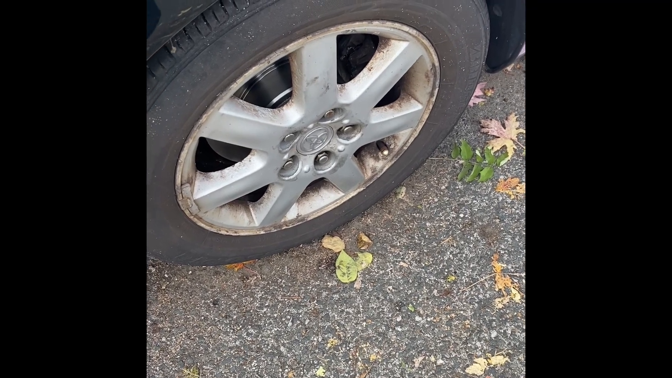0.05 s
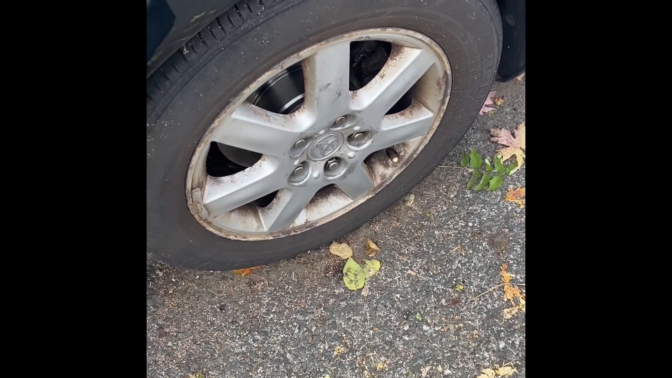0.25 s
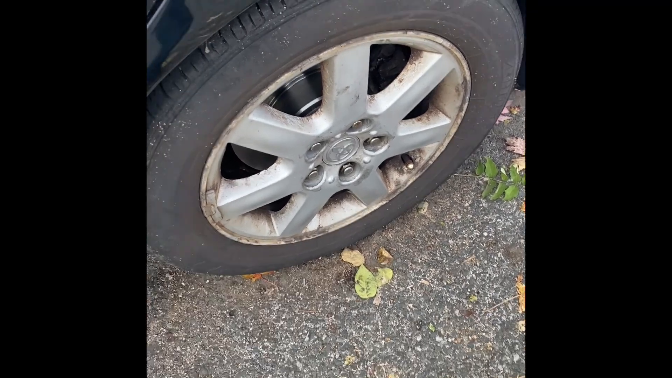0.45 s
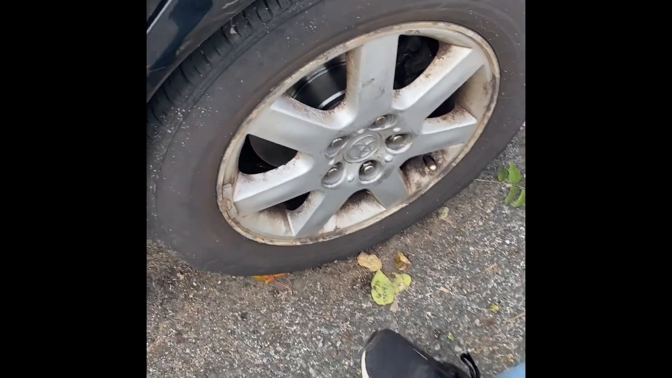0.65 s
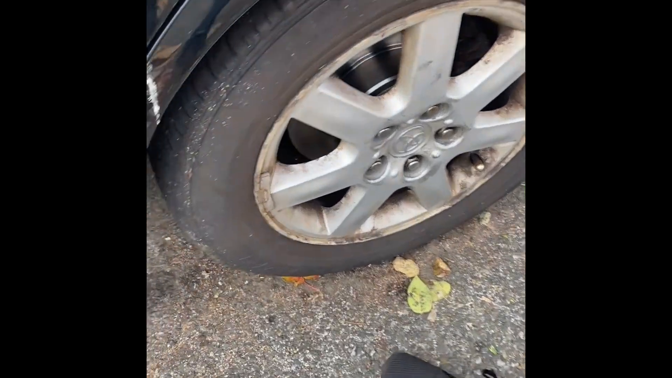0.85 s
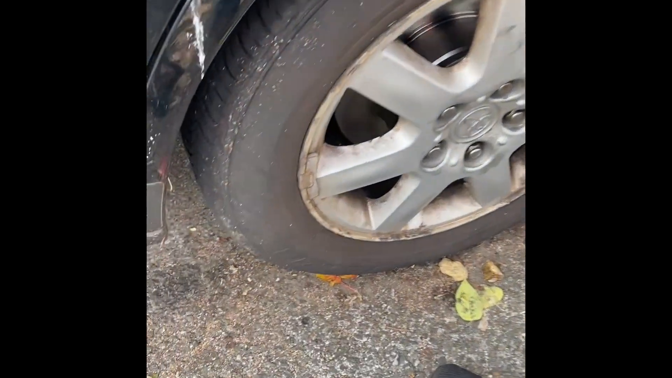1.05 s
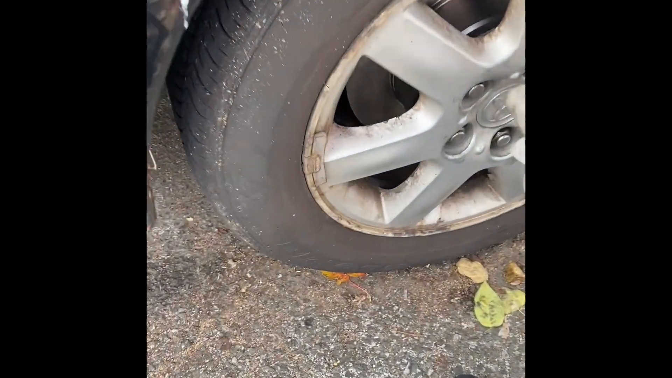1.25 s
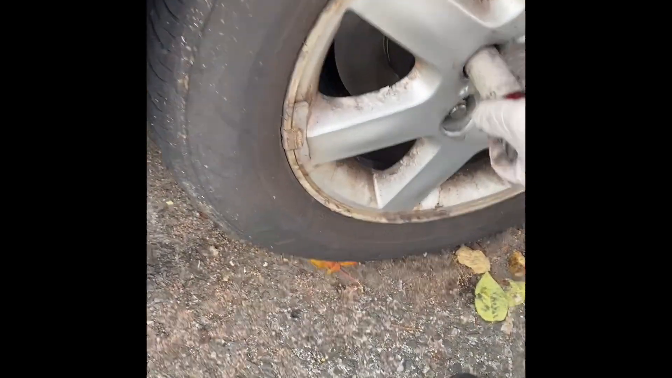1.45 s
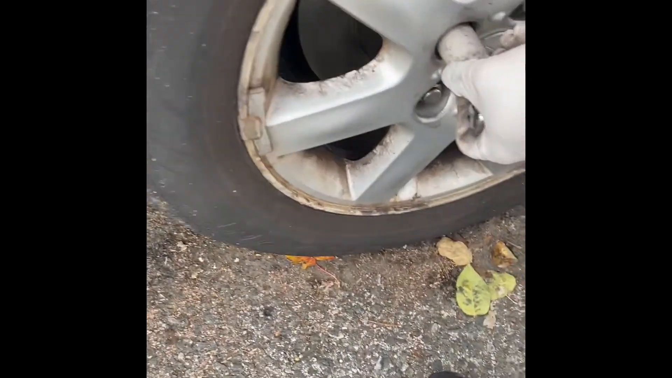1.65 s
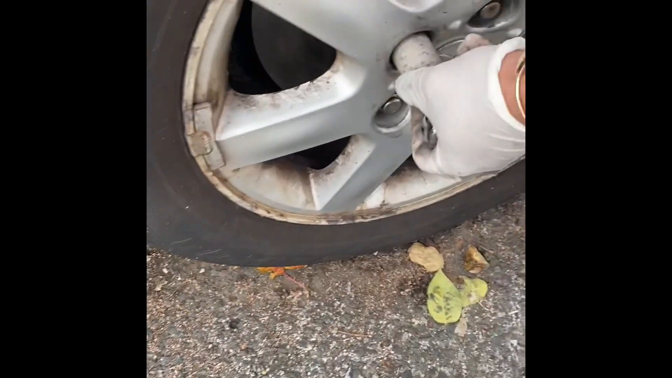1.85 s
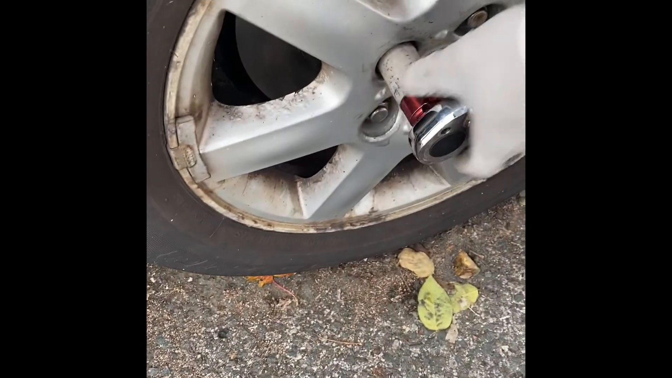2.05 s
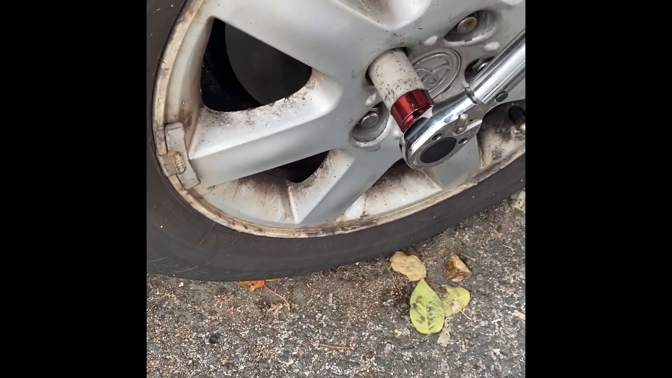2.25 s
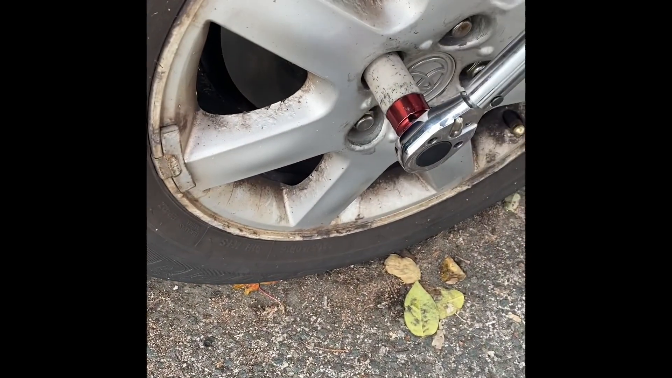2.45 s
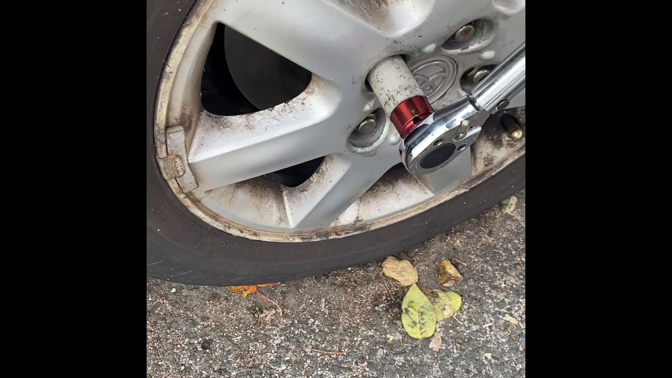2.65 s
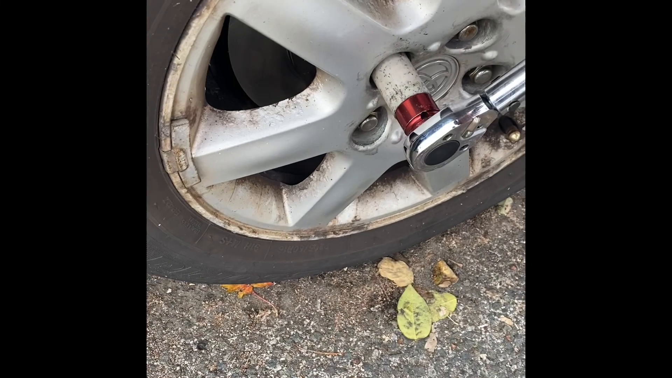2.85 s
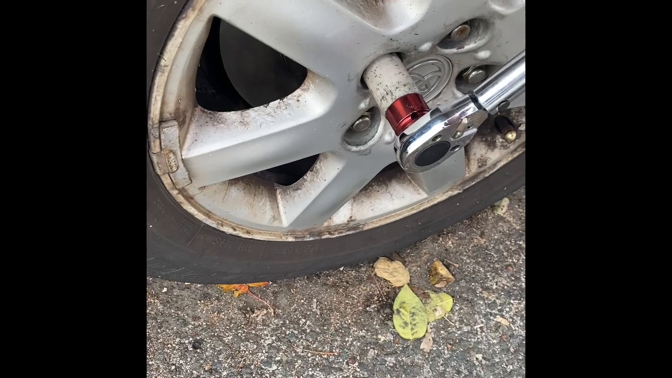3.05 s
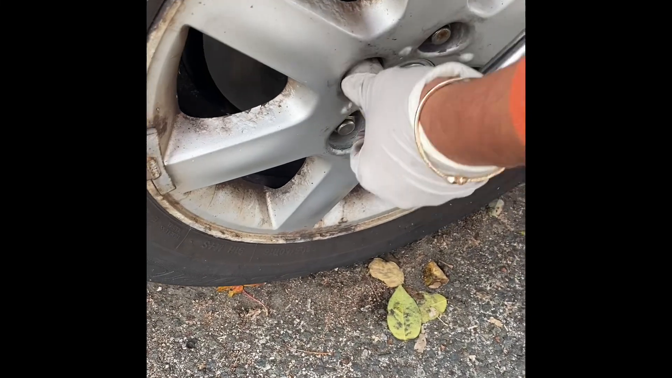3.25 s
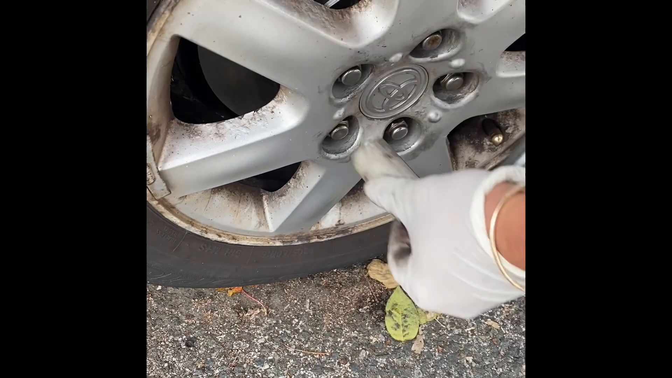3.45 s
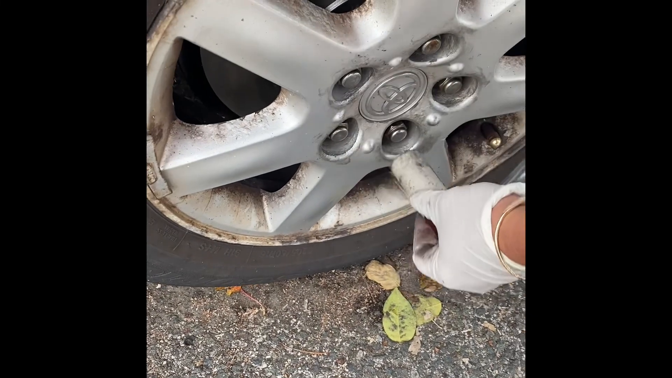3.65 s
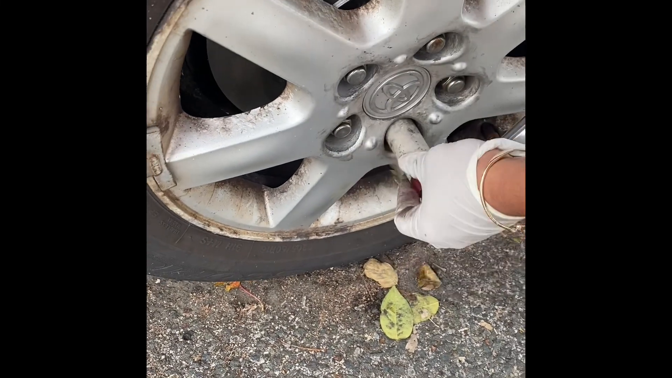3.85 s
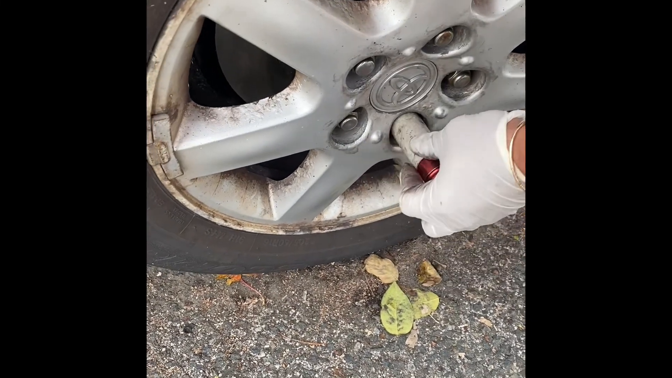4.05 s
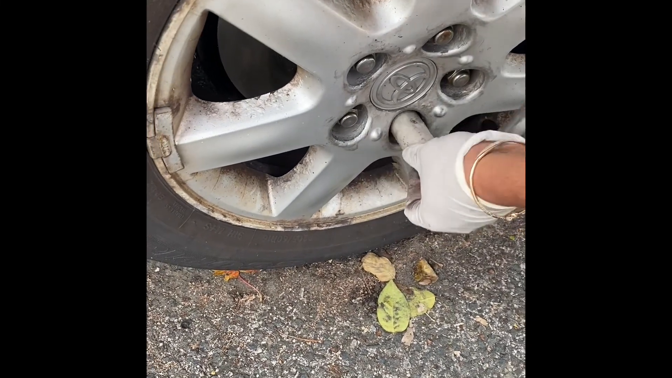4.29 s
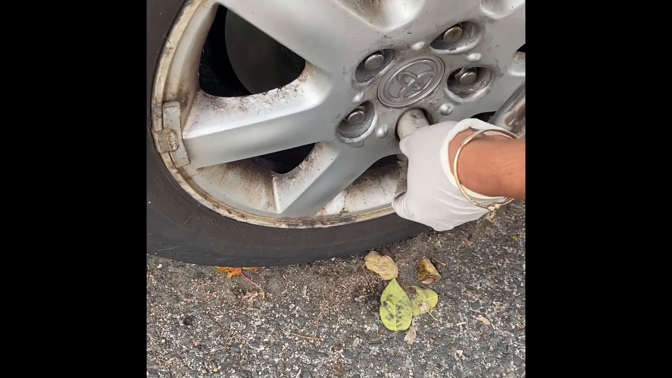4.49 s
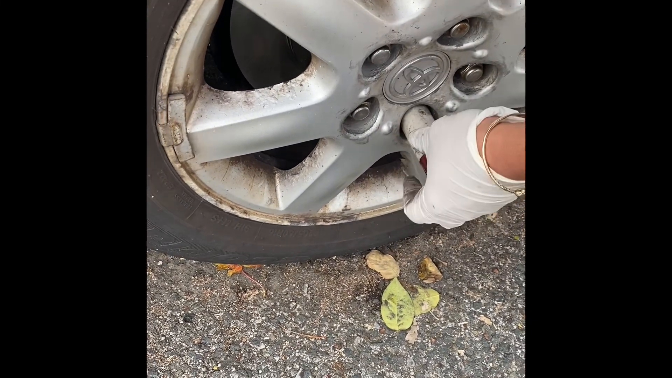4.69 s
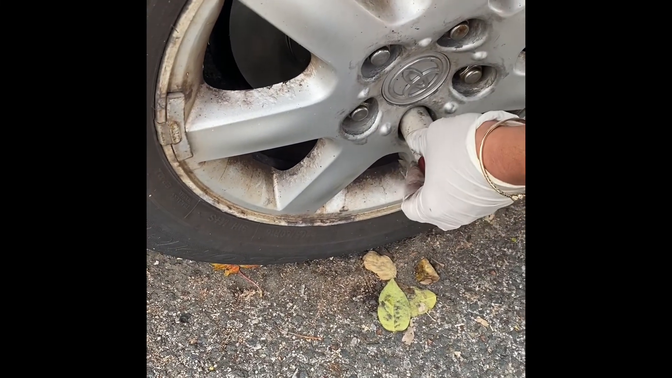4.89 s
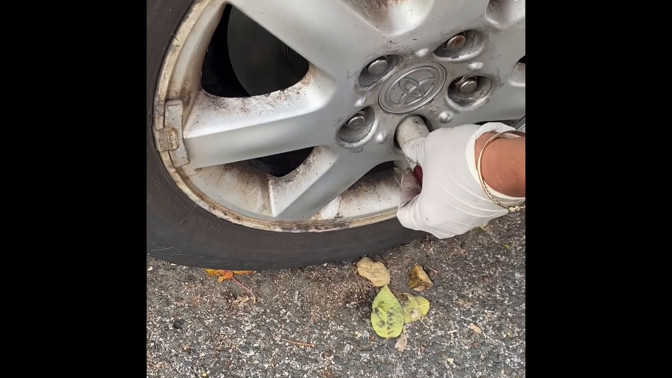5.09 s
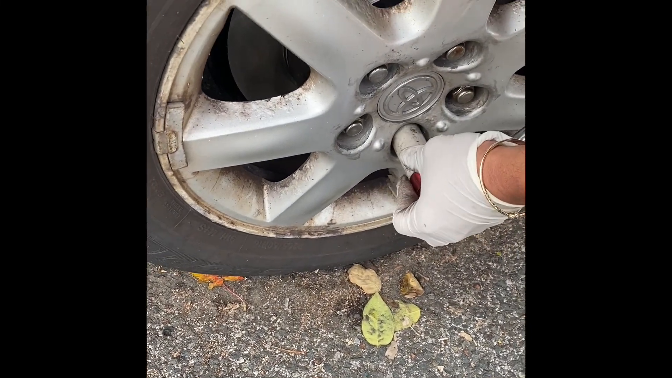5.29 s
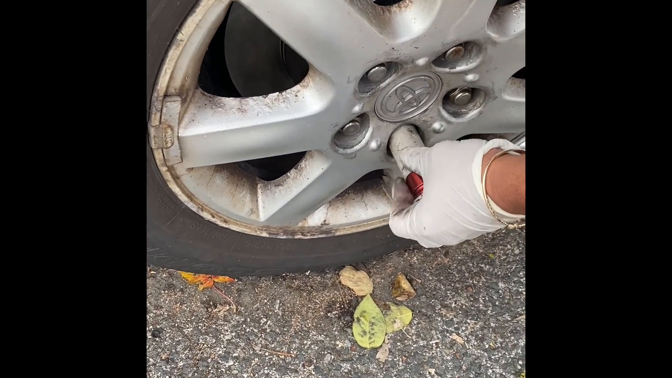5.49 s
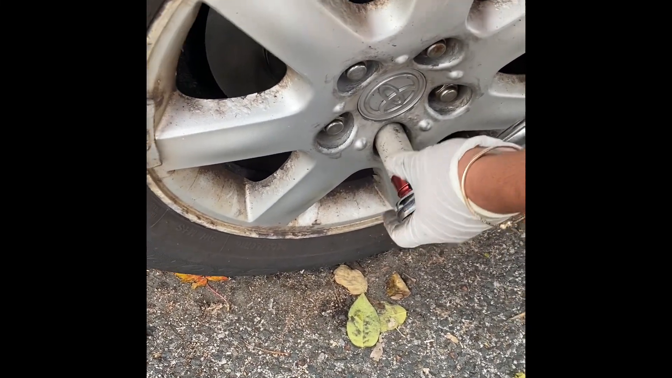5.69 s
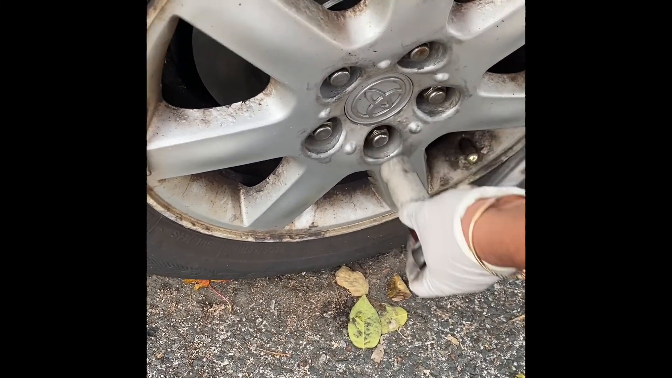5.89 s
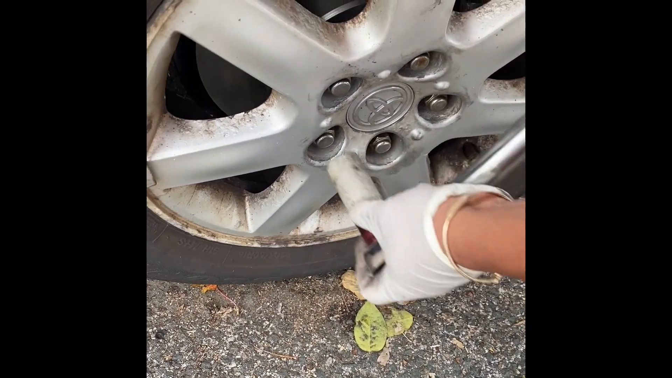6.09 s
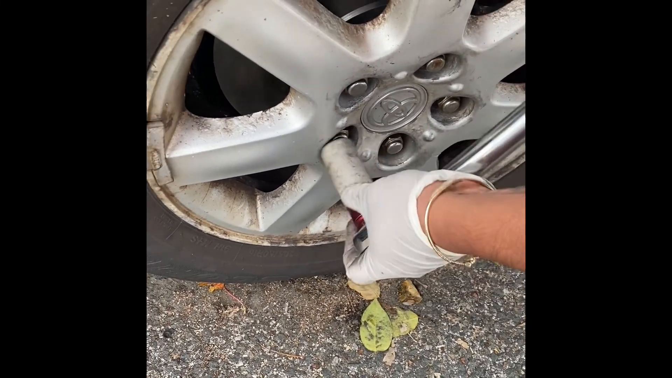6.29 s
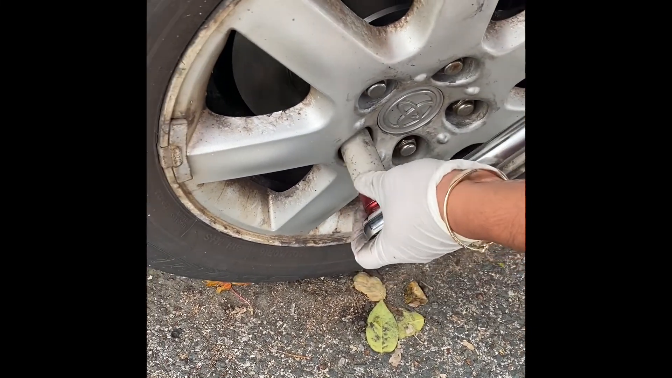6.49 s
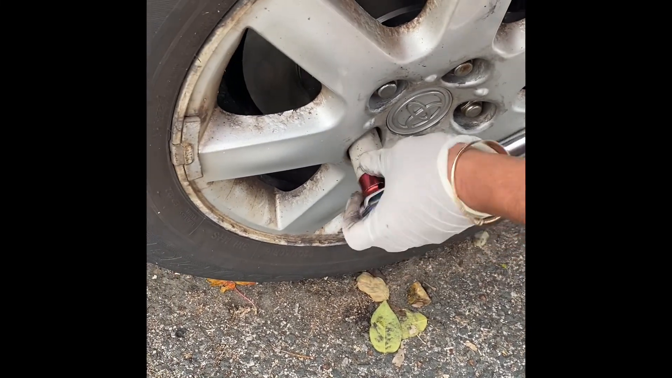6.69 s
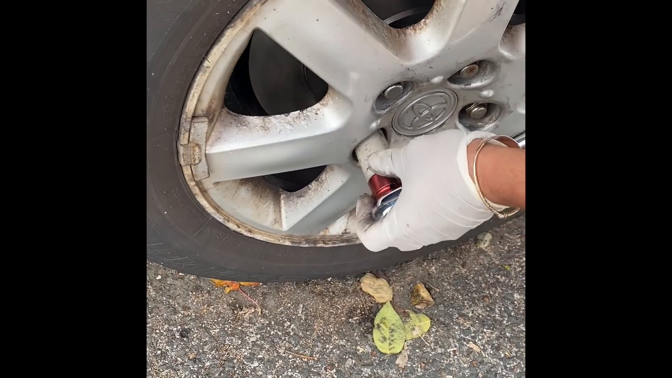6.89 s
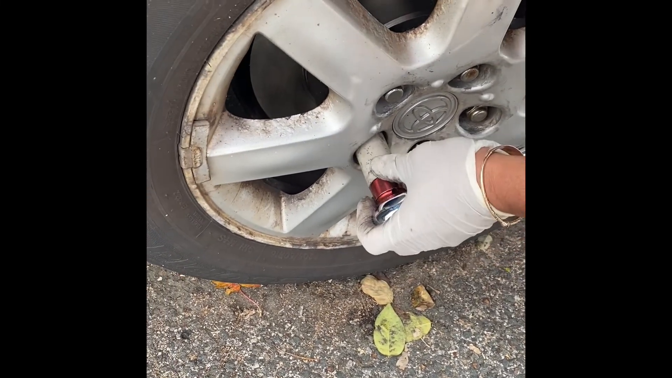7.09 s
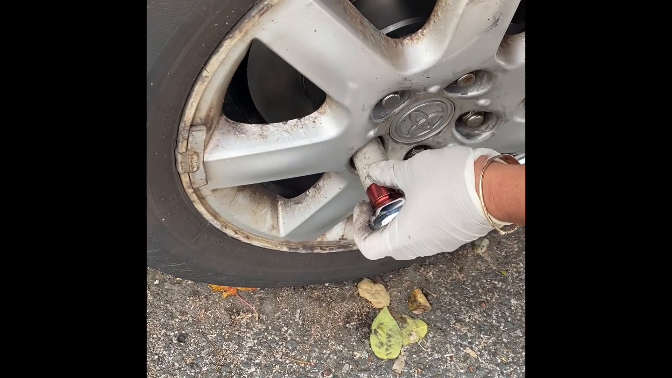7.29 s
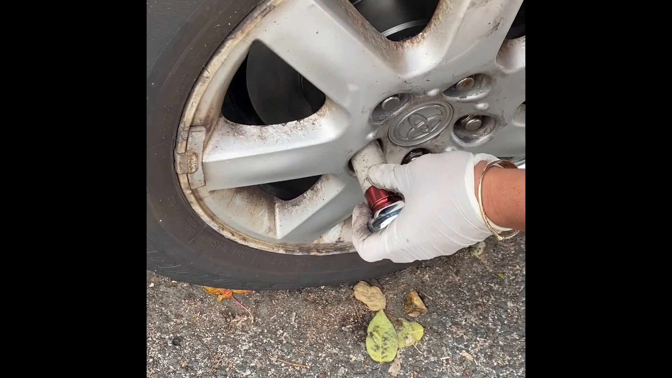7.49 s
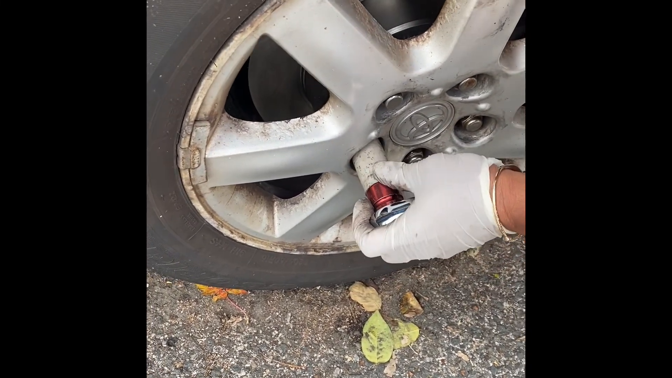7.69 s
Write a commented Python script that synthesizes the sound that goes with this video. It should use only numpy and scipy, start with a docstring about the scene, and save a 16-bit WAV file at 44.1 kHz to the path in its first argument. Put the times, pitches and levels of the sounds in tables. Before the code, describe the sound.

Close-up outdoors on asphalt: quiet rustling and tiny ticks, then a socket knocks and scrapes against an alloy wheel nut. Two hard wrench clicks with dull thumps follow. The socket moves to the next nuts with more clinks, each followed by sharp clicks. Soft glove crackle and faint distant rumble continue underneath. Near, dry stereo sound with almost no echo.

```python
"""Torque wrench on lug nuts

Outdoors on asphalt, a socket clatters onto wheel nuts and the wrench breaks over with a hard click and thump.
Contacts are short bursts of coloured noise; wheel, tyre, socket and spring ring as decaying modes.
Small ticks, scrapes, glove crackles and tyre shudders come from brief clicks and swelling noise.
Steady noise makes the low rumble and rustling hiss; short echoes and two microphone ports give the space."""
import sys
import numpy as np
from scipy import signal
from scipy.fft import rfft, irfft, next_fast_len
from scipy.io import wavfile
from scipy.ndimage import uniform_filter1d

SR = 44100
rng = np.random.default_rng(int(sys.argv[2]) if len(sys.argv) > 2 else 0)


def bounce(signal):
    """Save signal as a 16-bit WAV file at the path given by the first command-line argument."""
    frames = np.transpose(np.atleast_2d(signal))
    limited = np.clip(frames, -1, 1)
    pcm = np.round(limited * 32767).astype(np.int16)
    wavfile.write(sys.argv[1], SR, pcm)


N = 341334
TIME = np.arange(N) / SR
PADDED = next_fast_len(N, real=True)
FREQS = np.maximum(np.fft.rfftfreq(PADDED, 1 / SR), 1)

# Table levels are relative: sources add layer offsets, and noise colours are scaled to rms 1.
# modes of the wheel on its tyre: (frequency [Hz], level [dB], t60 [s])
TYRE_MODES = [(64.7, -7, 0.79), (80, -6.5, 0.27), (98.65, -7, 0.41), (150, 0, 0.32)]
# modes of the alloy spokes and rim: (frequency [Hz], level [dB], t60 [s])
RIM_MODES = [(299, -15, 0.17), (429.5, -15, 0.21), (521, -14, 0.099), (605, -15.5, 0.15),
             (702, -13.5, 0.12), (832, -20, 0.2), (1364, -10, 0.063), (1592, -18.5, 0.088)]
# modes of the socket and wrench body: (frequency [Hz], level [dB], t60 [s])
STEEL_MODES = [(1350, -30, .05), (2000, -18, 0.071), (2480, -25.5, 0.045), (2752, -31, .09),
               (3300, -32, .06), (3650, -17.5, 0.068), (4030, -17, .035), (4585, -29, .05)]
# modes of the handle's jolt through the hub: (frequency [Hz], level [dB], t60 [s])
JOLT_MODES = [(130, -16, 0.05), (255, -1, .02), (455.4, -1.5, 0.032)]
# colour of steel contacts: (frequency [Hz], level per Hz [dB])
CRACK_COLOUR = [(400, -2.5), (900, -4), (1500, 0.5), (2200, 1), (3000, -1.5), (3900, 2.5), (5200, -4),
                (6500, -2), (8500, -21)]
# bright top of contacts and hiss: (frequency [Hz], level per Hz [dB])
TREBLE_COLOUR = [(5000, -37), (7000, -3), (9000, -2.5), (11000, -4), (13000, -7), (15500, -13.5),
                 (17000, -27)]
# many damped low modes of wheel and hub: (frequency [Hz], level per Hz [dB])
HUB_COLOUR = [(70, -21.5), (130, 4.5), (280, 1.5), (430, -1), (560, -6.5), (800, -13), (1300, -32.5)]
# the socket's single high mode: (frequency [Hz], level [dB], t60 [s])
SOCKET_MODE = [(9100, 0, 0.062)]


def from_db(db):
    """Decibels to gain."""
    return 10 ** (np.asarray(db) / 20)


def at_freqs(points):
    """A table over log frequency, read at every bin."""
    hz, value = np.transpose(points)
    return np.interp(np.log(FREQS), np.log(hz), value)


def noise(spectrum):
    """Coloured noise of rms 1."""
    white = rng.standard_normal(PADDED)
    coloured = irfft(rfft(white) * from_db(at_freqs(spectrum)), PADDED)[:N]
    return coloured / coloured.std()


def swell(s, length):
    """One smooth stroke of height 1."""
    return np.sin(np.pi * np.clip((TIME - s) / length, 0, 1))


def bandpass(x, low_hz, high_hz, run=signal.sosfilt):
    """Keep one band of a sound."""
    return run(signal.butter(2, [low_hz, high_hz], "band", fs=SR, output="sos"), x)


def soften(x, cut_hz):
    """Heavy parts take a moment to get moving, so a low-pass rounds the blow."""
    return signal.sosfilt(signal.butter(2, cut_hz, fs=SR, output="sos"), x)


def clatter(times, level_db, decay_ms, spectrum, rise_ms, tail_db, tail_ms):
    """Steel faces chatter for a few ms after each touch; a weaker wash returns from the wheel well."""
    power = np.zeros(N)
    age_ms = 1000 * TIME[:SR // 4]
    attack = 1 - np.exp(-(age_ms / max(rise_ms, .1)) ** 2)
    wash = from_db(tail_db) * attack * np.exp(-age_ms / tail_ms)
    for s, db, fall_ms in zip(times, level_db, decay_ms):
        chatter = attack * np.exp(-age_ms / max(fall_ms, .3))
        shape = chatter / chatter.max() + wash
        start = int(s * SR)
        power[start:start + len(shape)] += (from_db(db) * shape[:N - start]) ** 2
    grain = noise(spectrum)
    # level the noise's own short swings so that the envelope sets the strength
    grain_level = np.sqrt(uniform_filter1d(grain ** 2, size=130) + 1e-6)
    return np.sqrt(power) * grain / grain_level


def strike(times, level_db, modes, scatter_db):
    """Each blow sets every mode ringing as a decaying sine with a strength of its own."""
    out = np.zeros(N)
    at = (times * SR).astype(int)
    chance = rng.standard_normal((len(at), len(modes)))
    for k, (hz, db, t60) in enumerate(modes):
        blows = np.full(N, 1e-18)
        polarity = (-1) ** k
        blows[at] = from_db(level_db + db + scatter_db * chance[:, k]) * polarity
        radius = from_db(-60 / (t60 * SR))
        angle = 2 * np.pi * hz / SR
        resonator = [1, -2 * radius * np.cos(angle), radius * radius]
        out += signal.lfilter([0, np.sin(angle)], resonator, blows)
    return out


def clang(times, level_db, pitch_hz, decay_s, spread):
    """The place of contact favours one dense cluster of heavily damped steel modes, made of band noise."""
    out = np.zeros(N)
    age = TIME[:SR // 12]
    shape = np.exp(-age / decay_s) * (1 - np.exp(-age / 0.00066))
    for s, db, hz in zip(times, level_db, pitch_hz):
        white = rng.standard_normal(len(age))
        cluster = bandpass(white, hz / (1 + spread), hz * (1 + spread), run=signal.sosfiltfilt)
        cluster = cluster / np.sqrt(uniform_filter1d(cluster ** 2, size=150) + 1e-9)
        start = int(s * SR)
        out[start:start + len(age)] += (from_db(db) * shape * cluster)[:N - start]
    return out


def wrench_breaks(crack_db=0, treble_db=0, clack_db=-10, steel_db=-8, clang_db=-2, jolt_db=9,
                  hub_db=-13, rim_db=-7, tyre_db=-23, ring_db=-1, spring_db=-41, jolt_lag_s=0.0019):
    """The pawl tips over with a crack; the handle hits its stop just after and jolts the wheel."""
    # the wrench breaks over or snaps back: (time [s], crack [dB], treble [dB], thump [dB],
    # socket ring [dB], clang [dB], base clatter decay [ms])
    breaks = [(2.6505, -15, -11.5, -16, -18.5, -20, 1.74), (2.9391, -11, -17, -16, -20, -21, 3.04),
              (5.156, -14.5, -13.5, -18, -29, -19.5, 3.75), (5.5402, -9.5, -15.5, -15, -27, -19.5, 3.93),
              (7.422, -10.5, -10, -16.5, -42, -27.5, 2.3)]
    # colour of the pawl's crack: (frequency [Hz], level per Hz [dB])
    snap_colour = [(1200, -29), (2200, -10.5), (2800, -0.5), (3900, 3), (4700, -3.5), (5600, -8.5),
                   (6600, 0.5), (8500, -28)]
    # lower body of the crack: (frequency [Hz], level per Hz [dB])
    clack_colour = [(350, -20), (600, -6.5), (800, -0.5), (1050, -3), (1600, 2), (2100, -2), (3200, -16)]
    s, crack, treble, thump, ring, body, decay = np.transpose(breaks)
    out = clatter(s, crack + crack_db, decay, snap_colour, rise_ms=0.34, tail_db=-30, tail_ms=30)
    out += clatter(s, treble + treble_db, decay * 1.1, TREBLE_COLOUR,
                   rise_ms=0.33, tail_db=-29.5, tail_ms=11)
    out += clatter(s, crack + clack_db, decay * 1.8, clack_colour, rise_ms=0.37, tail_db=-35, tail_ms=120)
    out += strike(s, crack + steel_db, STEEL_MODES, scatter_db=0.5)
    out += clang(s, body + clang_db, np.full(len(s), 3750), decay_s=0.0073, spread=0.26)
    out += strike(s, ring + ring_db, SOCKET_MODE, scatter_db=5)
    out += spring_ring(s, crack + spring_db)
    stop = s + jolt_lag_s
    out += clatter(stop, thump + hub_db, decay * 4, HUB_COLOUR, rise_ms=6.1, tail_db=-21, tail_ms=27)
    out += soften(strike(stop, thump + jolt_db, JOLT_MODES, scatter_db=0.0), cut_hz=450)
    out += strike(stop, thump + rim_db, RIM_MODES, scatter_db=-3.5)
    return out + strike(stop, thump + tyre_db, TYRE_MODES, scatter_db=2.0)


def spring_ring(times, level_db, t60=0.37, shimmer_db=-1, modes_db=-5):
    """The coil spring in the handle shimmers on after each release, as fading noise and clear modes."""
    # colour of the shimmer: (frequency [Hz], level per Hz [dB])
    shimmer_colour = [(1500, -24.5), (2200, -6), (2750, -7.5), (3400, 2.5), (4300, 3), (5000, -6),
                      (6200, -6.5), (9000, -24)]
    # clearest modes of the spring: (frequency [Hz], level [dB], t60 [s])
    clear_modes = [(2900, -12, 0.4), (2800, -11, 0.45), (4150, -6.5, .6), (4700, -12, .7), (5270, -11, .5)]
    kicks = np.zeros(N)
    kicks[(times * SR).astype(int)] = from_db(level_db + shimmer_db)
    fade = signal.lfilter([1], [1, -from_db(-60 / (t60 * SR))], kicks)
    shimmer = noise(shimmer_colour) * fade
    return shimmer + strike(times, level_db + modes_db, clear_modes, scatter_db=1.0)


def socket_knocks(crack_db=-5, treble_db=-2, clunk_db=-6, steel_db=-9, clang_db=-2, jolt_db=2,
                  rim_db=-3, spoke_db=-8, hub_db=-10, tyre_db=-16, ring_db=-6):
    """The socket hunts for the nut and seats; spokes, rim and tyre answer in step with the clunk."""
    # socket against nut and wheel: (time [s], steel [dB], treble [dB], wheel clunk [dB],
    # thump [dB], socket ring [dB], clang frequency [Hz])
    knocks = [(1.3069, -20.5, -41, -47, -38, -25, 4594), (1.3508, -25.5, -46, -26, -29, -37, 2320),
              (1.3974, -25.5, -41, -33.5, -49, -47, 1710), (1.4132, -34, -34, -39, -51, -45, 2290),
              (1.4354, -23, -36, -26.5, -53, -49, 1780), (1.4477, -27, -32, -36.5, -48, -56, 1516),
              (1.482, -10.5, -21.5, -28, -34, -29, 2250), (1.6447, -28, -36, -38, -36, -46, 1460),
              (2.0971, -34, -25, -25.5, -26.5, -45.5, 1510),
              (2.1064, -22.5, -16.5, -36.5, -43, -38.5, 5230), (2.1181, -21.5, -24, -30, -14.5, -39, 3893),
              (2.1422, -8.5, -12, -42, -25, -38.5, 4630), (2.6342, -23.5, -39.5, -30.5, -38.5, -38.5, 2594),
              (3.226, -31.5, -64.5, -35.5, -37, -40, 5530), (3.701, -31, -56, -35.5, -27, -63, 1824),
              (3.7431, -21.5, -33, -35, -37.5, -57, 1930), (3.7572, -8.5, -17.5, -22.5, -25.5, -20.5, 3740),
              (4.2826, -30, -67, -30, -29.5, -70, 1983), (4.5094, -30, -28.5, -36, -57, -27, 2140),
              (6.1243, -14.5, -19.5, -21.5, -40.5, -54, 3885), (6.2913, -25.5, -38, -33.5, -34, -44, 4000),
              (6.3128, -17, -25, -29.5, -49, -31, 4080), (6.3633, -22, -37.5, -26, -49, -63, 3620),
              (6.601, -28, -58.5, -41.5, -53, -55, 1590), (6.649, -14, -24, -27.5, -33, -33, 2680),
              (6.7266, -31, -43, -36, -37, -36, 1656), (7.0113, -36.5, -32, -39.5, -43.5, -59, 5900)]
    # colour of the wheel's clunk: (frequency [Hz], level per Hz [dB])
    clunk_colour = [(150, -33.5), (330, 13.5), (480, 15.5), (800, 5), (1200, -1.5), (1900, -33.5)]
    spoke_mode = [(765, 0, 0.092)]  # (frequency [Hz], level [dB], t60 [s])
    s, steel, treble, clunk, thump, ring, pitch = np.transpose(knocks)
    rise = 0.85  # ms, base rise
    decay = np.full(len(s), 3.3)  # ms, base decay
    out = clatter(s, steel + crack_db, decay, CRACK_COLOUR, rise_ms=rise, tail_db=-32.5, tail_ms=42)
    out += clatter(s, treble + treble_db, decay, TREBLE_COLOUR,
                   rise_ms=rise * 1.4, tail_db=-31.5, tail_ms=21)
    out += clatter(s, clunk + clunk_db, decay * 1.3, clunk_colour, rise_ms=rise, tail_db=-13, tail_ms=46.0)
    out += clang(s, steel + clang_db, pitch, decay_s=0.0035, spread=0.2)
    out += strike(s, steel + steel_db, STEEL_MODES, scatter_db=1.5)
    out += strike(s, clunk + rim_db, RIM_MODES, scatter_db=4)
    out += strike(s, ring + ring_db, SOCKET_MODE, scatter_db=3.5)
    out += soften(strike(s, thump + jolt_db, JOLT_MODES, scatter_db=5), cut_hz=300)
    out += strike(s, clunk + spoke_db, spoke_mode, scatter_db=0.0)
    out += clatter(s, thump + hub_db, decay * 4, HUB_COLOUR, rise_ms=1, tail_db=-18.0, tail_ms=20)
    return out + soften(strike(s, clunk + tyre_db, TYRE_MODES, scatter_db=4.5), cut_hz=210)


def handle_ticks(crack_db=-5, treble_db=-4, clang_db=-4, rim_db=-14):
    """Play in the ratchet head and handle makes light touches that barely reach the wheel."""
    # ticks: (time [s], crack [dB], treble [dB])
    ticks = [(0.3598, -47.5, -47), (0.6301, -38.5, -44), (0.6568, -35, -48), (0.9827, -33, -44.5),
             (1.5782, -38.5, -47), (1.952, -26, -65), (2.0467, -29.5, -25), (2.5391, -39, -50),
             (2.6, -30, -52), (2.613, -26.5, -38), (3.1255, -42.5, -52), (3.1801, -33, -49),
             (3.3007, -39, -52.5), (3.5025, -43.5, -43.5), (3.9618, -46, -51), (4.17, -51, -46.5),
             (4.3767, -39, -65), (5.3485, -22.5, -63), (5.4989, -46.5, -37.5), (5.7139, -39, -57),
             (5.7889, -22.5, -31), (6.7528, -44, -47), (7.029, -37, -37.5), (7.2606, -43, -71.5),
             (7.2996, -48, -54), (7.6982, -31, -63)]
    s, crack, treble = np.transpose(ticks)
    pitch_hz, decay_ms = np.full(len(s), 2240), np.full(len(s), 2.2)
    out = clatter(s, crack + crack_db, decay_ms, CRACK_COLOUR, rise_ms=0.48, tail_db=-22.0, tail_ms=32)
    out += clatter(s, treble + treble_db, decay_ms, TREBLE_COLOUR, rise_ms=1.0, tail_db=-20.0, tail_ms=11.0)
    out += clang(s, crack + clang_db, pitch_hz, decay_s=0.0029, spread=0.39)
    return out + strike(s, crack + rim_db, RIM_MODES, scatter_db=2.5)


def backswing(start_s=7.13, teeth_per_s=30.5, tooth_db=-56.5, count=9, size_db=3, unevenness=0.122):
    """The pawl slips lightly over the teeth on the back swing: a faint, slightly uneven run of clicks."""
    chance = rng.standard_normal((count, 2))
    s = start_s + (np.arange(count) + unevenness * chance[:, 0]) / teeth_per_s
    level = tooth_db + size_db * chance[:, 1]
    return clatter(s, level, np.full(count, 1.4), CRACK_COLOUR, rise_ms=0.41, tail_db=-17, tail_ms=14)


def scrapes(slips_per_s=900, size_db=4, width=1.69):
    """Tiny uneven slips ring in a broad band while the surfaces slide."""
    # socket and glove slide over metal: (time [s], length [s], level [dB], centre frequency [Hz])
    slides = [(0.627, 0.079, -58, 2260), (1.384, 0.096, -36, 2000), (2.101, 0.042, -32, 6080),
              (2.584, 0.054, -41.5, 2200), (2.642, 0.016, -24, 3280), (2.911, 0.061, -39.5, 3750),
              (3.168, 0.18, -55.5, 1307), (4.243, 0.062, -53.5, 1847), (4.279, 0.046, -45, 603),
              (5.325, 0.098, -49.5, 1520), (6.305, 0.047, -33, 1408), (6.342, 0.06, -45, 826),
              (7.091, 0.056, -66.5, 1590), (7.563, 0.054, -50.5, 575)]
    sign = rng.choice([-1, 1], N)
    size = from_db(size_db * np.minimum(rng.exponential(1, N), 3))
    slips = (rng.random(N) < slips_per_s / SR) * sign * size
    slips = slips + 0.11 * rng.standard_normal(N)
    out = np.zeros(N)
    for s, length, db, hz in slides:
        grit = bandpass(slips, hz / width, min(hz * width, .4 * SR))
        out += from_db(db) * swell(s, length) * grit / grit.std()
    return out


def glove_crinkles(busy, per_s=28, size_db=5, level_db=4):
    """The glove creases in tiny crackles at random times, stronger while the hand is busy."""
    chance = rng.random((400, 2))
    when = np.cumsum(-np.log(chance[:, 0])) / per_s
    size = size_db * np.minimum(-np.log(chance[:, 1]), 3)
    level = 20 * np.log10(np.interp(when, TIME, busy)) + level_db + size
    heard = when < TIME[-1]
    return clatter(when[heard], level[heard], np.full(heard.sum(), 1.5), CRACK_COLOUR,
                   rise_ms=0.93, tail_db=-17.5, tail_ms=11)


def tyre_shudders():
    """The rubber rocks on the ground with a soft, low wobble of swelling noise."""
    # the wheel is pushed or the handle loaded: (time [s], length [s], level [dB])
    shudders = [(1.478, 0.18, -39), (2.795, 0.31, -43), (2.93, 0.19, -40), (3.767, 0.084, -36),
                (4.287, 0.11, -34.5), (4.509, 0.09, -34), (5.545, 0.075, -35.5), (6.125, 0.075, -41),
                (6.645, 0.14, -38)]
    # colour of the wobble: (frequency [Hz], level per Hz [dB])
    wobble_colour = [(40, -30.5), (70, 5.5), (105, 8), (145, 5), (210, -4), (400, -43)]
    strength = sum(from_db(db) * swell(s, length) for s, length, db in shudders)
    return noise(wobble_colour) * strength


def metal_colour(x, ring_db, decay_s, count=26, low_hz=1900, high_hz=6000):
    """The many close modes of wheel and wrench lend the sound an uneven, metallic colour."""
    age = TIME[:SR // 16]
    chance = rng.random((count, 2))
    hz = low_hz * (high_hz / low_hz) ** ((np.arange(count) + chance[:, 0]) / count)
    modes = np.cos(2 * np.pi * (hz[:, None] * age + chance[:, 1:])).sum(axis=0)
    response = from_db(ring_db) * modes * np.exp(-age / decay_s) * 2 / (decay_s * SR)
    return x + signal.fftconvolve(x, response)[:N]


def yard(x, wet_db=-31, t60=0.085, build_s=0.002):
    """A faint tail of scattered echoes from car and yard, made with decaying noise."""
    # colour of the echoes: (frequency [Hz], level per Hz [dB])
    echo_colour = [(100, -6), (800, -7), (1800, 1), (2800, 0.5), (4400, -6.5), (6000, -8.5), (9000, -18.5),
                   (16000, -20)]
    response = noise(echo_colour) * from_db(-60 * TIME / t60) * (1 - np.exp(-TIME / build_s))
    return from_db(wet_db) * signal.fftconvolve(x, response / np.linalg.norm(response))[:N]


def rustle_levels(steady_hiss_db=-80, steady_high_db=-81):
    """Each move swells and sinks over the steady hiss: gains of the hiss and of the high hiss."""
    # clothes and glove rustle as body or hand moves: (time [s], length [s], hiss [dB], high hiss [dB])
    rustles = [(0.1, 0.36, -68.5, -71), (0.296, 1.13, -58.5, -64), (1.5, 0.6, -66, -66),
               (1.97, 0.19, -54, -56), (2.2, 0.65, -73, -75), (3.1, 0.25, -62, -62.5),
               (3.38, 0.28, -72.5, -70.5), (3.92, 0.78, -69, -68.5), (4.14, 0.18, -77, -62.5),
               (5.023, 0.33, -64, -70.5), (5.33, 0.37, -68.5, -62.5), (5.55, 1.05, -65, -87.5),
               (6.56, 0.25, -60, -69.5), (6.86, 0.27, -73.5, -64.5), (7.4, 1.07, -62, -70.5)]
    hiss_power = np.full(N, from_db(steady_hiss_db) ** 2)
    high_power = np.full(N, from_db(steady_high_db) ** 2)
    for s, length, hiss_db, high_db in rustles:
        stroke = swell(s, length)
        hiss_power += (from_db(hiss_db) * stroke) ** 2
        high_power += (from_db(high_db) * stroke) ** 2
    return np.sqrt(hiss_power), np.sqrt(high_power)


def background(hiss, high, rumble_db=-48, flutter_db=2.0):
    """Distant rumble of low noise, and a soft rustle of hiss that flutters unevenly."""
    # outdoor rumble: (frequency [Hz], level per Hz [dB])
    rumble_colour = [(12, -56.5), (20, -35.5), (41, -8.5), (60, 0.5), (124, -5.5), (162, -12), (188, -11.5),
                     (301, -19), (676, -29), (864, -27), (931, -36.5), (1020, -32.5), (1800, -44.5),
                     (2340, -71.5), (3960, -120)]
    # hiss below the treble: (frequency [Hz], level per Hz [dB])
    hiss_colour = [(500, -17.5), (1200, -2.5), (2500, 1.5), (3800, -1), (5500, -2), (7500, -6.5),
                   (9500, -34.5)]
    # slow noise moves the rustle's level in dB
    flutter = flutter_db * noise([(5, 0), (30, -3), (120, -20), (500, -80)])
    rustle = hiss * noise(hiss_colour) + high * noise(TREBLE_COLOUR)
    rustle = metal_colour(from_db(flutter) * rustle, ring_db=2.5, decay_s=0.014)
    return from_db(rumble_db) * noise(rumble_colour) + rustle


def ports(x):
    """Two microphone ports hear the same sound with different phase and level."""
    # left port's lead: (frequency [Hz], phase [rad])
    port_phase = [(20, 0), (150, 0), (400, -.12), (1550, -.25), (2400, .3), (3270, 1.3), (4130, .7),
                  (5340, .7), (6630, 2.5), (7900, 3.55), (9800, 5.8), (11000, 6.7), (12800, 8.8),
                  (14300, 10), (16000, 12.2)]
    # left level minus right level: (frequency [Hz], difference [dB])
    port_balance = [(60, 0), (110, 0), (200, -1), (380, -1.5), (700, -4), (1290, -2.5), (2380, -0.5),
                    (4400, -1.5), (8120, -0.5), (15000, 0)]
    # each port takes half the difference, in opposite directions
    tilt = from_db(at_freqs(port_balance) / 2)
    turn = np.exp(.5j * at_freqs(port_phase))
    left_right = np.array([tilt * turn, 1 / (tilt * turn)])
    return irfft(rfft(x, PADDED) * left_right, PADDED)[:, :N]


def wheel_face(x, scatter_db=-18, decay_s=.006, low_hz=200):
    """Very near reflections reach the two ports unequally; long waves reach both alike."""
    # sound scattered by the wheel face: (frequency [Hz], level per Hz [dB])
    scatter_colour = [(150, -31.5), (600, 10), (3500, 2.5), (6000, -15), (10000, -28.5)]
    burst = rng.standard_normal(N) * np.exp(-TIME / decay_s)
    response = irfft(rfft(burst, PADDED) * from_db(at_freqs(scatter_colour)), PADDED)[:SR // 20]
    response = signal.sosfilt(signal.butter(2, low_hz, "high", fs=SR, output="sos"), response)
    scattered = signal.fftconvolve(x, response / np.linalg.norm(response))[:N]
    return from_db(scatter_db) * scattered * np.array([[1], [-1]])  # opposite sign at each port


def scene():
    """Tools at arm's length, with the yard around them."""
    hiss, high = rustle_levels()
    tools = wrench_breaks() + socket_knocks() + handle_ticks()
    tools += backswing() + scrapes() + glove_crinkles(high)
    tools = metal_colour(tools, ring_db=-1.5, decay_s=.008) + tyre_shudders()
    sound = tools + yard(tools) + background(hiss, high)
    return ports(sound) + wheel_face(sound)


def record(dry):
    """Peaks are clipped, then a steep low-pass cuts the top of the band."""
    cutoff_hz = 16500
    low_pass = signal.ellip(10, .1, 90, cutoff_hz, fs=SR, output="sos")
    return signal.sosfilt(low_pass, np.clip(dry, -.9, .9))


dry = scene()
out = record(dry)
bounce(out)
```